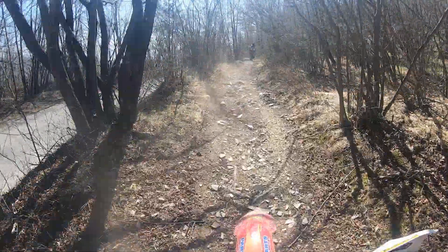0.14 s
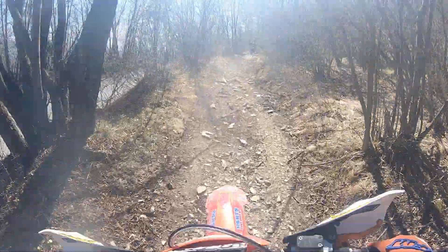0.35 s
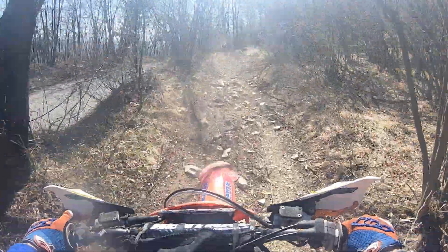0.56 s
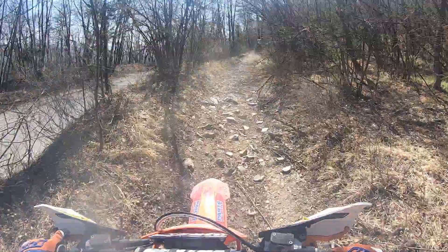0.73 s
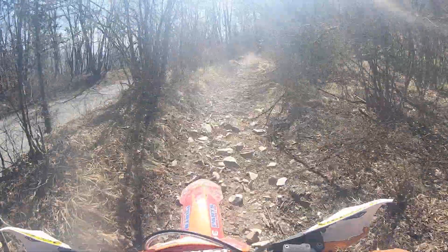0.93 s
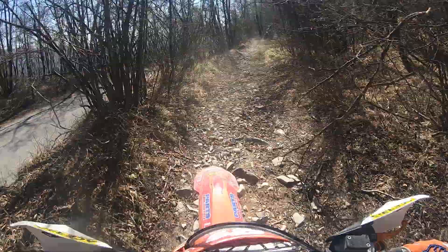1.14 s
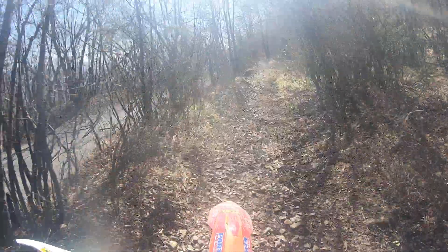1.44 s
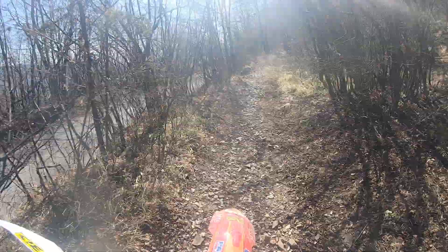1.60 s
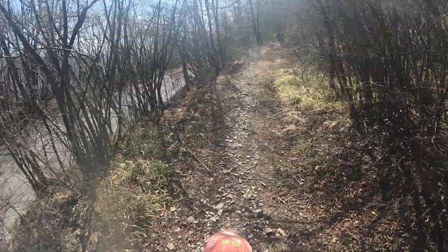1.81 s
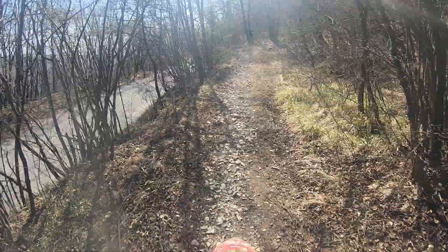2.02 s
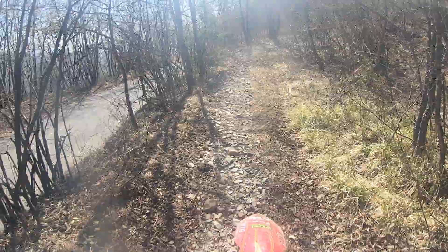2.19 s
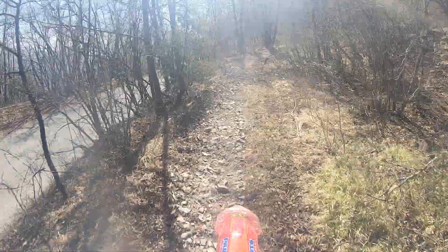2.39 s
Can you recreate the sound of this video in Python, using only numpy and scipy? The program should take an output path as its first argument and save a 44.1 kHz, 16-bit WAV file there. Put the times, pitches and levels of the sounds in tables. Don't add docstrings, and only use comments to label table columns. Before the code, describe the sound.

A single-cylinder dirt bike engine, heard from the rider's chest outdoors, coasts briefly, booms under throttle, roughens, drops, surges again with wheelspin, then shuts off into low exhaust pops, over mechanical rattle and low wind rumble.

```python
import sys
import numpy as np
from scipy import signal
from scipy.io import wavfile
from scipy.ndimage import uniform_filter1d

SR = 44100
rng = np.random.default_rng(int(sys.argv[2]) if len(sys.argv) > 2 else 0)


def to_wav(sig):
    pcm = np.clip(np.atleast_2d(sig), -1, 1) * 32767
    pcm = np.round(pcm).astype(np.int16)
    wavfile.write(sys.argv[1], SR, pcm.T)


def attenuation_scalar(level_db):
    decades = np.asarray(level_db, float) / 20
    return 10 ** decades


N = 112454


def rms_one(x):
    return x / np.sqrt(np.mean(x ** 2) + 1e-20)


def in_time(rows):
    s, *columns = np.transpose(rows)
    return [np.interp(np.arange(N) / SR, s, c) for c in columns]


def at_hz(points, hz):
    point_hz, point_db = np.transpose(points)
    return np.interp(np.log(hz), np.log(point_hz), point_db)


def drift(rate):
    every = 40
    settle = 2000
    r = np.exp(-2 * np.pi * rate * every / SR)
    white = rng.standard_normal(N // every + 2 + settle)
    slow = signal.lfilter([1], [1, -2 * r, r * r], white)[settle:]
    return np.interp(np.arange(N) / every, np.arange(len(slow)), rms_one(slow))


def cut(x, hz, kind, order=2):
    return signal.sosfilt(signal.butter(order, hz, kind, fs=SR, output="sos"), x)


def banded(spectrum, low_hz, count, patchy_db, flicker):
    edges = low_hz * 2 ** (np.arange(count + 1) / 3)
    white = rng.standard_normal((2, N))
    out = 0
    for k in range(count):
        centre_hz = np.sqrt(edges[k] * edges[k + 1])
        gain_db = at_hz(spectrum, centre_hz) + patchy_db * drift(flicker)
        out = out + attenuation_scalar(gain_db) * cut(white[k % 2], edges[k:k + 2], "band")
    return rms_one(out)


def burst(s, t60, attack_s):
    t = np.maximum(np.arange(N) / SR - s, 0)
    return (1 - np.exp(-t / attack_s)) * attenuation_scalar(-60 * t / t60)


def peak(f, hz, width_hz):
    return 1 / (1 + 1j * (f / hz - hz / f) * hz / width_hz)


def resonate(x, hz, width_hz):
    r = np.exp(-np.pi * width_hz / SR)
    zeros = np.array([1, 0, -1]) * (1 - r * r) / 2
    return signal.lfilter(zeros, [1, -2 * r * np.cos(2 * np.pi * hz / SR), r * r], x)


def crank_hz():
    # time in seconds, turns per second in Hz.
    speed_curve = [(0, 76.1), (.17, 68.7), (.22, 59.94), (.34, 54.48), (.48, 62.6), (.64, 59.98),
                   (.8, 65.26), (.87, 71.4), (.95, 70.26), (1.02, 77.23), (1.18, 80.1), (1.3, 88.7),
                   (1.4, 66.88), (1.76, 75.39), (1.87, 71.86), (2.03, 92.5), (2.16, 98.2), (2.55, 72.46)]
    # time in seconds, change of speed in Hz, rise and fall in seconds.
    wheel_jolts = [
        (1.06, -7, .03, 0.0474),
        (1.212, -11.5, .02, 0.0588),
        (1.52, 28, .12, .04),
        (1.56, 20.5, .04, 0.069),
        (1.662, -5.5, .06, 0.0784),
        (2.092, -3.5, 0.034, 0.054),
    ]
    t = np.arange(N) / SR
    (hz,) = in_time(speed_curve)
    for s, change, rise, fall in wheel_jolts:
        hz = hz + change * np.interp(t, [s - rise, s, s + fall], [0, 1, 0])
    unsteady = 1 + 0.0034 * drift(17)
    return uniform_filter1d(hz, size=900) * unsteady


def firing(*controls):
    # frequency in Hz, level in dB.
    bark_colour = [(60, -17.5), (160, 2), (300, -8.5), (400, -0.5), (520, -7.5), (680, -11), (950, -21.5),
                   (1400, -41)]
    # frequency in Hz, width in Hz, dB under the boom.
    silencer_modes = [(452, 47.5, -19.5), (727, 44.4, -27), (932, 27, -29.5), (1122, 25, -32),
                      (1320, 49, -34.5), (1830, 40, -42.5), (1931, 65, -43.5)]
    bark_lag_s = 0.00302
    hop = 8
    hz, turns, boom_db, centre_hz, width_hz, bark_db, rough = (c[::hop] for c in controls)

    stumble_s, stumble_length_s = 1.558, 0.022
    stumble = np.exp(-((np.arange(0, N, hop) / SR - stumble_s) / stumble_length_s) ** 2)
    boom_db = boom_db - 9 * stumble
    rough = rough + 0.8 * stumble

    ring_db = -11 + 0.72 * (boom_db + 11)
    tilt_db = 17.5 * np.log2(hz / 70)
    box_top_hz, box_floor_hz = centre_hz + 0.6 * width_hz, 130
    out = 0
    for k in np.arange(1, 27):
        f = k * hz
        box = 1 / (1 + 2j * (f - centre_hz) / width_hz) ** 4
        box = box / np.sqrt((1 + (f / box_top_hz) ** 12) * (1 + (box_floor_hz / f) ** 6))

        silencer = 0
        for i, (top_hz, wide_hz, db) in enumerate(silencer_modes):
            gain = attenuation_scalar(db + tilt_db * np.log2(top_hz / 500))
            silencer = silencer + (-1) ** i * gain * peak(f, top_hz, wide_hz)
        pipe = attenuation_scalar(at_hz(bark_colour, f)) * (f < 1600)

        shake = (drift(35) + 1j * drift(35))[::hop] / np.sqrt(2)
        share = np.clip(rough * k ** .5 * .6 + 0.0092 * (k - 4) * (k > 4), 0, 1)
        wave = np.exp(2j * np.pi * k * turns) * (np.sqrt(1 - share ** 2) + share * shake)

        tail_size = np.hypot(attenuation_scalar(ring_db) * abs(silencer), attenuation_scalar(bark_db) * abs(pipe))
        tail_phase = np.angle(silencer) - 2 * np.pi * f * bark_lag_s
        tail = tail_size * np.exp(1j * tail_phase)
        out = out + np.sqrt(2) * ((attenuation_scalar(boom_db) * box + tail) * wave).real
    return signal.resample_poly(out, hop, 1)[:N]


def pops():
    # time in seconds, peak in dB, pitch in Hz.
    late_firings = [
        (0.038, -22, 84),
        (2.203, -15, 215.5),
        (2.241, -27.5, 278),
        (2.263, -38, 125.3),
        (2.341, -15.5, 136),
        (2.397, -18, 105.6),
        (2.462, -43, 254.9),
        (2.495, -19.5, 190),
        (2.516, -27, 120),
    ]
    t = np.arange(N) / SR
    puff = cut(rng.standard_normal(N), [150, 500], "band")
    out = 0
    for s, db, hz in late_firings:
        ring = np.sin(2 * np.pi * hz * (t - s))
        out = out + attenuation_scalar(db) * burst(s, t60=0.11, attack_s=0.0029) * (ring + 0.51 * puff)
    return out


def rattle(hz, turns, boom_db, bark_db):
    # frequency in Hz, level in dB per Hz.
    metal_colour = [(350, -10.5), (700, 1), (850, -0.5), (1250, 5.5), (1450, -3.5), (2000, -16),
                    (2900, -27), (5600, -18)]
    # frequency in Hz, width in Hz, level in dB.
    casing_modes = [(830, 90, -13), (1150, 80, -12), (1950, 70, -22), (3550, 120, -32), (4010, 110, -35),
                    (4950, 200, -31), (5450, 200, -31)]
    octaves = np.log2(hz / 70)
    gate = (1 + 0.083 * np.cos(2 * np.pi * (turns - .3))) * attenuation_scalar(1.4 * drift(120) + 1.7 * drift(4.7))

    body = banded(metal_colour, low_hz=320, count=13, patchy_db=-0.16, flicker=9.9)
    for top_hz, width_hz, db in casing_modes:
        mode = rms_one(resonate(rng.standard_normal(N), top_hz, width_hz))
        body = body + attenuation_scalar(db + 2.5 * drift(6)) * mode
    body = cut(body, 5910, "low", order=6)

    sheen_top_hz, sheen_db = 9200, -36
    sheen = cut(rng.standard_normal(N), [6000, sheen_top_hz], "band")
    sheen = attenuation_scalar(sheen_db) * rms_one(cut(sheen, sheen_top_hz, "low", order=8))

    level_db = -34 + 9 * octaves + 0.08 * (boom_db + 20) + 0.15 * (bark_db + 30)
    treble_hz = 2620
    treble_db = -1 * octaves + 0.11 * (boom_db + 20) + 0.08 * (bark_db + 30)
    treble = cut(body, treble_hz, "high", order=4) + sheen
    metal = cut(body, treble_hz, "low", order=4) + attenuation_scalar(treble_db) * treble

    hiss = cut(rng.standard_normal(N), 11900, "high", order=10)
    hiss = rms_one(cut(hiss, 14300, "low"))
    start_s = 0.94
    start_db = np.interp(np.arange(N) / SR, [start_s - .15, start_s + .1], [-22.5, 0])
    hiss_db = -73 + 9 * octaves + 0.25 * (bark_db + 39) + 0.1 * (boom_db + 22) + start_db
    return gate * (attenuation_scalar(level_db) * metal + attenuation_scalar(hiss_db + 1.5 * drift(200)) * hiss)


def ticks():
    # time in seconds, peak in dB.
    strikes = [
        (.188, -39),
        (1.455, -41),
        (2.252, -39),
    ]
    tick_hz = 5000
    crack = rms_one(cut(rng.standard_normal(N), [tick_hz * .4, tick_hz * 1.5], "band", order=3))
    return crack * sum(attenuation_scalar(db - 8) * burst(s, t60=0.062, attack_s=.002) for s, db in strikes)


def wind():
    # time in seconds, level in dB.
    wind_strength = [(0, -31.5), (.5, -34.5), (.9, -23.5), (1.5, -27), (2.0, -22), (2.55, -30)]
    # frequency in Hz, level in dB per Hz.
    gust_colour = [(25, -6.5), (50, -3.5), (90, -4), (140, 0.5), (250, -3.5), (400, -8)]
    rumble = banded(gust_colour, low_hz=21.58, count=13, patchy_db=3.0, flicker=11)
    return attenuation_scalar(in_time(wind_strength)[0]) * rumble


def scene():
    # time in seconds, air box boom in dB, boom centre in Hz,
    # boom width in Hz, exhaust bark in dB, roughness from 0 to 1.
    engine_load = [(0, -25.5, 261, 208.6, -49.5, 0.2), (.05, -33.5, 264, 104, -53, 0),
                   (.18, -32.5, 281, 100, -47, 0.2), (.225, -10.5, 250, 157.4, -43, 0.1),
                   (.8, -10.5, 258.4, 157.4, -39.5, 0.06), (.93, -14, 298, 118.3, -31, 0),
                   (1.03, -14.5, 285, 151, -27, 0.32), (1.27, -16, 281, 238, -24, 0.31),
                   (1.33, -36, 270, 200, -29, 0.7), (1.39, -27, 250, 154, -46.5, 0.2),
                   (1.42, -8, 314.5, 130, -41, 0.11), (1.51, -15, 281, 221.5, -18, 0.18),
                   (1.575, -14.5, 343.6, 156, -20.5, 0.4), (1.61, -8, 274, 143, -34.5, .03),
                   (1.8, -9.5, 269, 184, -33.5, 0.06), (2.1, -9, 263.6, 272.3, -33.5, 0),
                   (2.145, -11.5, 251, 218, -19, .3), (2.19, -29.5, 260.6, 207, -56, 0.65)]
    hz = crank_hz()
    turns = np.cumsum(hz) / SR
    boom_db, centre_hz, width_hz, bark_db, rough = in_time(engine_load)
    engine = firing(hz, turns, boom_db, centre_hz, width_hz, bark_db, rough) + pops()
    return (engine + rattle(hz, turns, boom_db, bark_db) + ticks() + wind())[None]


def top_cut(x):
    return signal.sosfilt(signal.butter(12, 15710, fs=SR, output="sos"), x)


def record(dry):
    housed = dry - 0.78 * resonate(dry, hz=1432, width_hz=310)
    clip_top = 0.72
    return top_cut(clip_top * np.tanh(housed / clip_top))


dry = scene()
out = record(dry)
to_wav(out)
```